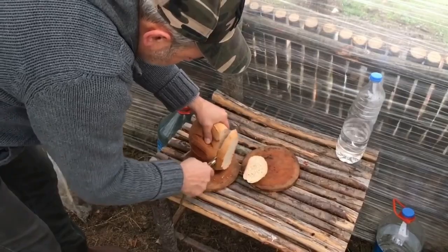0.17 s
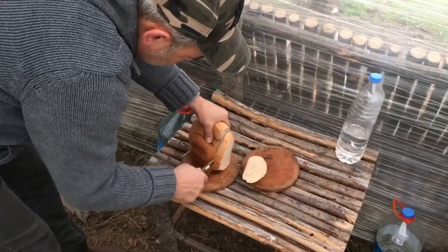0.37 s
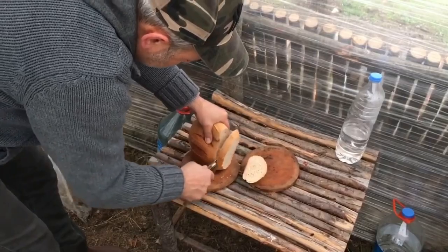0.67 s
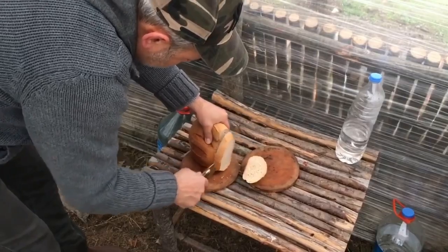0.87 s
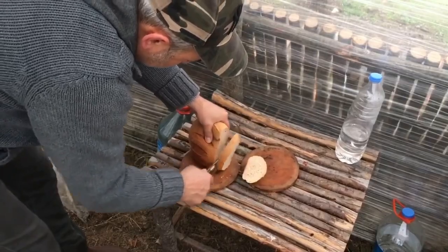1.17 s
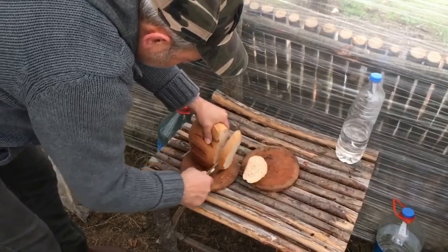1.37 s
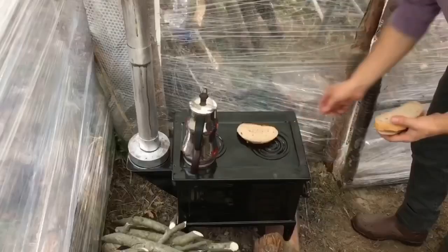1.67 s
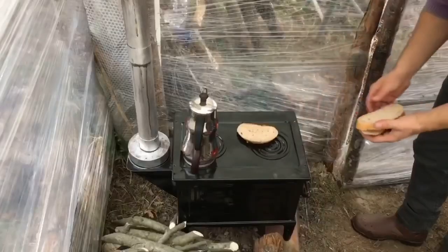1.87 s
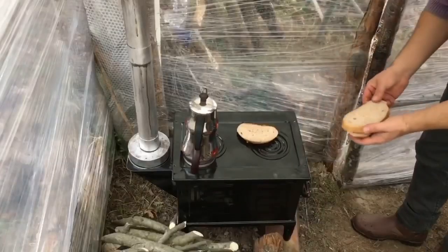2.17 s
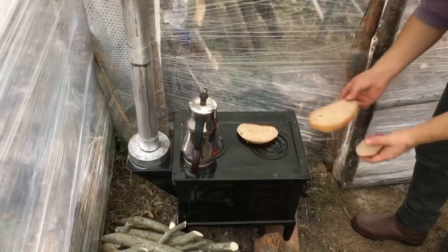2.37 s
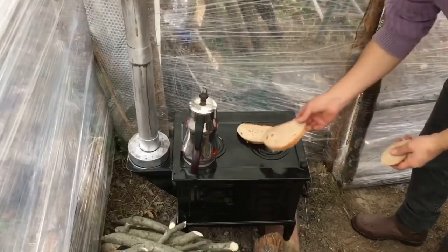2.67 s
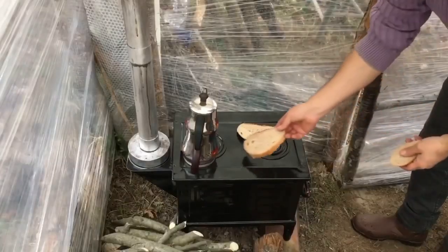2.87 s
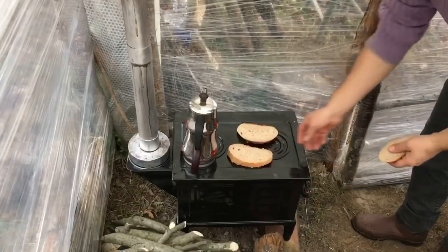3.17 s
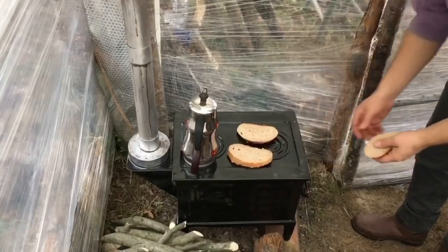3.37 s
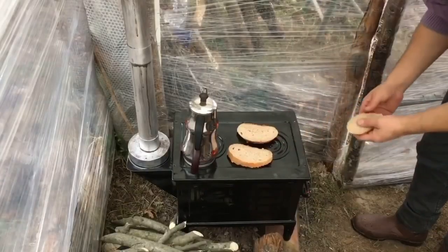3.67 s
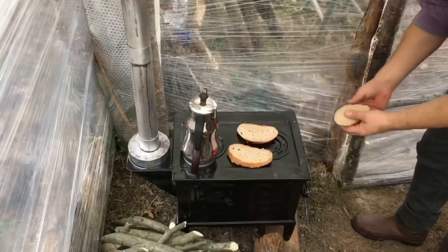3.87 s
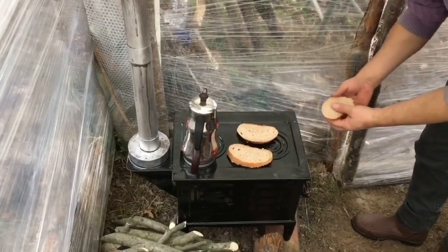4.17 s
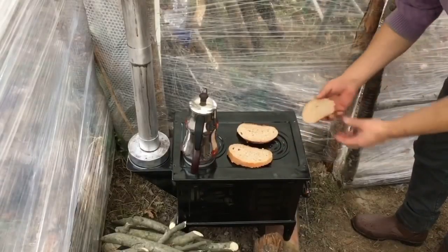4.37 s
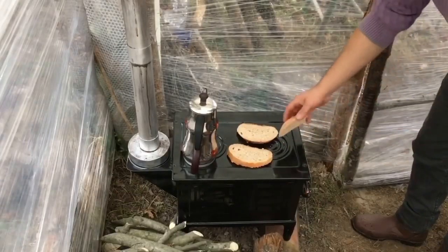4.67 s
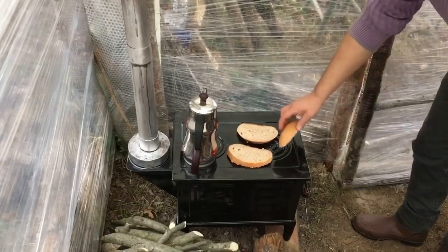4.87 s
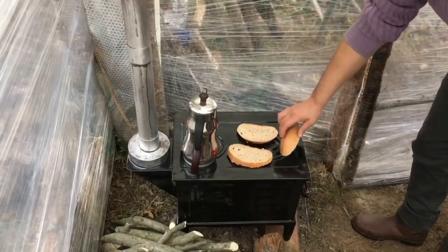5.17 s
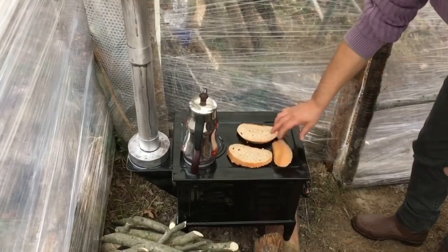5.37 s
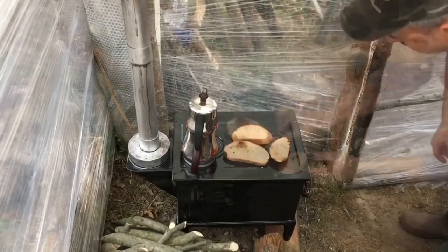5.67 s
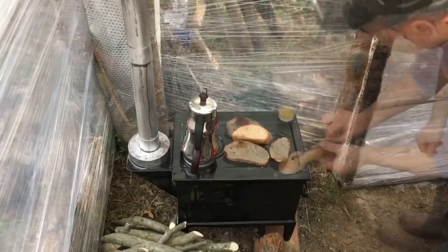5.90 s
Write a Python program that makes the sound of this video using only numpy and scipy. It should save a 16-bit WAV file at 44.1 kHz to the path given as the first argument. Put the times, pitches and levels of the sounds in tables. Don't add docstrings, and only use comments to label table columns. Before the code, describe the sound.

A knife crackles through a crusty loaf on a knocking board, then a kettle hisses on a stove as bread slices thump onto hollow metal.

```python
import sys
import numpy as np
from scipy import signal
from scipy.fft import rfft, irfft
from scipy.io import wavfile
from scipy.ndimage import uniform_filter1d

SR = 44100
rng = np.random.default_rng(int(sys.argv[2]) if len(sys.argv) > 2 else 0)


def elevation(decibels):
    levels = np.asarray(decibels, float)
    return 10 ** (levels / 20)


def master_out(mix):
    frames = np.transpose(np.atleast_2d(mix))
    ceiling = np.clip(frames, -1, 1)
    pcm = np.round(ceiling * 32767).astype(np.int16)
    wavfile.write(sys.argv[1], SR, pcm)


N = 266143


def evened(x):
    return x / np.sqrt(np.mean(x ** 2) + 1e-20)


def read(points, hz):
    f, value = np.transpose(points)
    return np.interp(np.log(hz + 1), np.log(f + 1), value)


def column(rows, t, order):
    table = np.array(rows)
    return np.interp(t, table[:, 0], table[:, order])


def add(mix, s, sound):
    part = mix[round(s * SR):][:len(sound)]
    part += sound[:len(part)]


def ring(x, hz, t60):
    r, w = 10 ** (-3 / (t60 * SR)), 2 * np.pi * hz / SR
    return signal.lfilter([0, np.sin(w)], [1, -2 * r * np.cos(w), r * r], x)


def shaped(x, gain_db):
    hz = np.fft.rfftfreq(len(x), 1 / SR) + 1
    return evened(irfft(rfft(x) * elevation(gain_db(hz)), len(x)))


def tilted(x, db_per_octave):
    return shaped(x, lambda hz: db_per_octave * np.log2(hz / 2000))


def humped(x, centre_hz, fall_db):
    return shaped(x, lambda hz: -fall_db * np.log2(hz / centre_hz) ** 2)


def patchy(x, field, patchy_db, flicker_db, size):
    hop = dict(nperseg=size, noverlap=size * 3 // 4)
    hz, t, z = signal.stft(x, SR, **hop)
    chance = rng.standard_normal(z.shape)
    patches = evened(uniform_filter1d(uniform_filter1d(chance, size=8, axis=0), size=10, axis=1))
    flicker = evened(uniform_filter1d(chance.mean(0), size=5))
    gain = elevation(field(hz[:, None], t) + patchy_db * patches + flicker_db * flicker)
    return evened(signal.istft(z * gain, SR, **hop)[1][:N])


# t/s, fire level/dB
DRAUGHT = [(0.0, -63), (0.35, -63.5), (0.65, -66.5), (1.44, -64.5), (1.54, -57.5), (2.05, -54.5),
           (2.45, -57.5), (2.9, -50), (3.21, -56.5), (3.37, -54), (3.7, -59), (4.05, -54.5), (4.99, -55),
           (5.29, -52), (5.59, -57), (5.73, -59)]
# f/Hz, density/dB per Hz
RUMBLE = [(12, -40), (20, -28.5), (55, -1), (123, -1.5), (173, -6), (208, -1.5), (269, -23), (334, -14),
          (461, -37), (500, -38), (650, -38), (1100, -120)]


def fire():
    rumble = patchy(rng.standard_normal(N), lambda hz, s: read(RUMBLE, hz),
                    patchy_db=1.5, flicker_db=2.73, size=2048)
    lumps = evened(uniform_filter1d(uniform_filter1d(rng.standard_normal(N), size=900), size=900))
    draught_db = column(DRAUGHT, np.arange(N) / SR, order=1)
    return elevation(draught_db + 0.73 * lumps + 1.0) * rumble


# f/Hz, density/dB per Hz
AIR = [(150, -10.5), (250, -1.5), (957, -7), (1950, -8), (2860, -11.5), (3560, -9), (4840, -14),
       (5740, -10), (9120, -13), (10000, -24), (13000, -46), (22000, -120)]
# start t/s, level/dB, drift/dB per s
SHOTS = [
    (0.0, -73, 0.1),
    (1.4655, -70.2, 1.25),
    (5.6, -69.8, -5.0),
]


def air():
    t = np.arange(N) / SR
    rustle = patchy(rng.standard_normal(N), lambda hz, s: read(AIR, hz),
                    patchy_db=.9, flicker_db=.4, size=512)
    level_db = np.zeros(N)
    for s, db, drift in SHOTS:
        level_db = np.where(t >= s, db + drift * (t - s), level_db)
    draught_db = column(DRAUGHT, t, order=1)
    level_db += 0.14 * (draught_db - uniform_filter1d(draught_db, size=SR))
    return elevation(level_db + 6.0) * rustle


def crack(db, hz, length_s, broad):
    clicks = rng.standard_normal(4000) * (0.2 + (rng.random(4000) < .06))
    t = np.arange(len(clicks)) / SR
    shower = clicks * (np.exp(-t / (.55 * length_s)) + 1.8 * np.exp(-t / .0015))
    octaves = 0.57 + 0.72 * broad
    edges_hz = np.clip(hz * 2. ** (np.array([-1, 1]) * octaves), 200, .45 * SR)
    tone = ring(shower, hz, 35 / hz)
    snap = signal.lfilter(*signal.butter(2, edges_hz, "bandpass", fs=SR), shower)
    broad = np.clip(broad, 0, 1)
    return elevation(db) * ((1 - broad) * tone / abs(tone).max() + broad * snap / abs(snap).max())


# t/s, peak level/dB, ring f/Hz, length/s, broad share/0-1
SPLITS = [(0.0278, -54, 5920, 0.022, 0.55), (0.281, -45.5, 6800, 0.02, 0.6), (0.345, -48, 5810, 0.024, 0.6),
          (0.4595, -44.5, 5690, 0.038, 0.5), (0.4864, -43, 7160, 0.014, 0.86),
          (0.551, -39.5, 5900, 0.023, 0.8), (0.562, -40.5, 8900, 0.013, 0.63),
          (0.682, -42.5, 6100, 0.07, 0.3), (0.756, -53, 8650, 0.024, 0.45), (0.797, -47, 5970, 0.033, 0.96),
          (0.8378, -43, 7000, 0.016, 0.54), (0.996, -46.5, 5820, 0.02, 0.45),
          (1.049, -48, 6150, 0.016, 0.55), (1.343, -45.5, 7990, 0.02, 0.64), (1.437, -34, 5930, 0.014, 0.7)]
# t/s, peak level/dB, ring f/Hz, length/s, broad share/0-1
CRACKS = [(0.12, -43.5, 3500, 0.022, 0.57), (0.126, -49, 2600, 0.02, 0.27),
          (0.228, -51.5, 3230, 0.025, 0.7), (0.512, -42, 2900, 0.021, 0.75),
          (0.525, -46, 2110, 0.044, 0.65), (0.613, -54, 2340, 0.03, 0.8), (0.649, -48.5, 2130, 0.048, 0.8),
          (0.7447, -47.5, 3930, 0.054, 1), (0.812, -42.5, 3640, 0.055, 0.45),
          (1.067, -42.5, 3400, 0.015, 0.8), (1.097, -65, 2140, 0.03, 0.7)]


def crust():
    out = np.zeros(N)
    for s, db, hz, length_s, broad in SPLITS + CRACKS:
        add(out, s, crack(db, hz, length_s, broad))
    return out


# peak t/s, level/dB, build-up/s
STROKES = [(0.122, -55.5, 0.042), (0.232, -64, 0.01), (0.555, -58, 0.11), (0.678, -65, 0.073),
           (0.82, -58, 0.013), (0.992, -62.5, 0.13), (1.342, -68, 0.018), (1.438, -54, 0.035),
           (5.218, -65, 0.03), (5.508, -52, 0.034), (5.554, -54, 0.02), (5.8, -65, 0.01)]
# start t/s, end t/s, level/dB
RESTING = [
    (0.23, 0.493, -69.5),
    (0.99, 1.44, -68.5),
    (5.226, 5.5, -67.5),
    (5.61, 6.03, -69.5),
]


def sawing():
    t = np.arange(N) / SR
    clumps = elevation(2.5 * evened(uniform_filter1d(rng.standard_normal(N), size=300)))
    splits = (rng.random(N) < 5000 / SR) * rng.standard_normal(N)
    splits = splits + .25 * rng.standard_normal(N)
    grains = signal.lfilter(*signal.butter(2, 1300., "highpass", fs=SR), clumps * splits)
    grains = tilted(grains, -3.0)
    depth_db, release_s = 29.5, 0.054
    pressure = np.zeros(N)
    for s, db, build_s in STROKES:
        pressure += elevation(db - depth_db * np.maximum((s - t) / build_s, (t - s) / release_s))
    resting = sum(elevation(db) * (t > a) * (t < b) for a, b, db in RESTING)
    pressure += uniform_filter1d(resting, size=600)
    return elevation(-2) * pressure * grains


# t/s, peak level/dB, ring f/Hz, t60/s
KNOCKS = [
    (0.315, -57, 264, 0.038),
    (0.497, -54.5, 207, 0.074),
    (0.694, -47.5, 257, 0.049),
    (1.145, -52, 263, 0.13),
    (1.396, -45, 209, 0.035),
    (1.899, -53, 324, 0.033),
    (2.568, -44.5, 300, 0.026),
]


def knocks():
    out = np.zeros(N)
    ratios = (.75, 1, 1.25, 1.5, 1.8, 2.1, 2.5, 2.9, 3.4, 3.9)
    for s, db, hz, t60 in KNOCKS:
        push = rng.standard_normal(6000) * np.exp(-np.arange(6000) / 690.0)
        thud = sum(ring(push, ratio * hz, t60 / ratio) for ratio in ratios)
        add(out, s, elevation(db) * thud / abs(thud).max())
    return out


# t/s, length/s, level/dB, start f/Hz, end f/Hz
SQUEAKS = [
    (.34, .12, -76, 3350, 3200),
    (.86, .1, -75, 2650, 2450),
    (1.285, .08, -72, 2750, 2480),
]


def squeaks():
    out = np.zeros(N)
    for s, length_s, db, start_hz, end_hz in SQUEAKS:
        t = np.arange(0, length_s, 1 / SR)
        turns = np.cumsum(np.linspace(start_hz, end_hz, len(t))) / SR
        fuzz = 1 + .4 * evened(uniform_filter1d(rng.standard_normal(8000), size=200))[:len(t)]
        swell = np.sqrt(np.sin(np.pi * t / length_s))
        add(out, s, elevation(db) * fuzz * np.sin(2 * np.pi * turns) * swell)
    return out


# t/s, level/dB, brightness/dB per octave
SIMMER = [(1.47, -58, -0.5), (1.66, -54.5, 0.5), (2.22, -48.5, 0.0), (2.41, -47.5, 1.5), (2.69, -48.5, 1.5),
          (3.11, -51, 0.0), (3.61, -47.5, -1), (3.87, -49, -2.5), (4.56, -55.5, -2.5), (5.1, -59, -3),
          (5.44, -74, 1), (5.6, -67, -2)]
# f/Hz, density/dB per Hz
SIMMER_BODY = [(410, -43), (700, -30), (1210, -24.5), (1590, -6.5), (3400, -1.5), (4110, -12.5), (5730, -4),
               (7240, -3.5), (8280, -6.5), (10000, -7.5), (13000, -39), (22000, -120)]
# f/Hz, width/Hz, level above body/dB
KETTLE = [(967, 420, 19.5), (2030, 140, 1.5), (2730, 580, 2), (3470, 180, 3), (4370, 1050, 9),
          (5170, 240, 9), (5590, 130, 7), (5850, 130, 10), (6270, 220, 3.5), (6740, 190, 7), (7000, 42, -9),
          (8210, 580, 10), (9100, 440, 6)]


def kettle():
    t = np.arange(N) / SR
    start_s, end_s = CUTS[0][0], CUTS[1][0]
    heights = rng.standard_normal(N) * elevation(1.33 * np.minimum(rng.exponential(1, N), 5))
    pops = (rng.random(N) < 6000 / SR) * heights
    water = np.exp(-np.arange(900) / 480.0) * rng.standard_normal(900)
    smeared = evened(signal.oaconvolve(pops, water)[:N])
    drive = evened(pops) + 1.1 * rng.standard_normal(N) + 0.29 * smeared

    def colour(hz, s):
        wall = sum(db / (1 + (2 * (hz - f) / width) ** 2) for f, width, db in KETTLE)
        ringing = read(SIMMER_BODY, hz) + wall
        plain = uniform_filter1d(ringing, size=28, axis=0)
        awake = np.clip(0.3 + 0.7 * ((s - start_s) / 0.55) ** 2, 0, 1)
        tilt = column(SIMMER, s, order=2) * np.log2((hz + 1) / 4000)
        return plain + awake * (ringing - plain) + tilt

    hiss = patchy(drive, colour, patchy_db=1.45, flicker_db=0.93, size=1024)
    return elevation(column(SIMMER, t, order=1) - 1.02) * hiss * (t > start_s) * (t < end_s)


# t/s, peak level/dB, ring f/Hz, broad share/0-1
TICKS = [(2.419, -50, 3200, 0.75), (3.787, -34, 2750, 0.7), (3.884, -35, 3470, 0.9),
         (4.05, -33, 2730, 0.66), (4.109, -32.5, 3640, 1.0), (4.349, -44.5, 1750, 1.0),
         (4.438, -36.5, 2930, 0.93), (4.506, -36.5, 2300, 0.88), (4.583, -37.5, 3330, 0.65),
         (4.69, -43, 1550, 0.7), (4.916, -37.5, 2960, 0.65), (5.063, -39, 2720, 0.55),
         (5.401, -42.5, 2930, 0.8), (5.508, -36, 2860, 0.7), (5.551, -35.5, 4280, 0.5),
         (5.793, -43.5, 2790, 0.54), (5.808, -46, 2030, 0.7), (3.492, -27, 5790, 0.9),
         (5.3527, -44, 5760, 0.55), (5.5694, -54, 5550, 0.4), (5.619, -50, 5250, 0.5),
         (5.6626, -37.5, 9250, 0.9)]


def crumbs():
    out = np.zeros(N)
    for s, db, hz, broad in TICKS:
        add(out, s, crack(db, hz, 0.011, broad))
    return out


# t/s, thump level/dB, contact/s, crust rattle level/dB, rattle f/Hz
LANDINGS = [(2.8084, -37, 0.0011, -39, 1270), (2.823, -54, 0.0035, -40, 1500),
            (2.8383, -28, 0.0017, -34.5, 2300), (2.857, -46, 0.00092, -45.5, 1150),
            (2.886, -60, 0.0051, -56, 890), (5.1335, -33, 0.0033, -54.5, 1500),
            (5.1534, -41, 0.0024, -41.5, 4200), (5.157, -20.5, 0.0035, -40, 1700),
            (5.186, -46, 0.001, -48, 1200), (5.228, -63, 0.0063, -55, 2400),
            (5.262, -60, 0.0049, -59.5, 1250)]
# f/Hz, level/dB, t60/s
BOX = [(156, -12, 0.16), (209, 2.5, 0.12), (244, 1.5, 0.069), (282, -5, 0.055), (316, -3.5, 0.16),
       (341, -4.5, 0.077), (430, -9, .06), (540, -5.5, 0.14)]
# f/Hz, level/dB, t60/s
PLATE = [(785, -8, .06), (950, -5, .07), (1034, -1, .06), (1145, -4, .08), (1300, -5, .05), (1570, -5, .07),
         (1995, -5, .08), (2350, -4, .05), (2692, -6, .08), (3203, -3, .07), (3520, -5, .05),
         (4195, -4, .08), (5750, -5, .07), (6573, -8, .05)]


def stove():
    blows, rattle, t = np.zeros(N), np.zeros(N), np.arange(12000) / SR
    rise = np.minimum(t / .004, 1)
    for s, db, contact_s, rattle_db, centre_hz in LANDINGS:
        push = np.sin(np.pi * np.clip(t[:900] / contact_s, 0, 1)) ** 2
        add(blows, s, elevation(db) * push / push.sum())
        lumps = np.repeat(rng.standard_normal(len(t) // 100), 100)
        grit = rng.standard_normal(len(t)) * elevation(2.1 * lumps)
        t60 = 0.15 * (centre_hz / 1500) ** -0.23
        add(rattle, s, elevation(rattle_db - 60 * t / t60) * rise * humped(grit, centre_hz, fall_db=2.5))
    box = sum(elevation(db) * ring(blows, hz, t60) for hz, db, t60 in BOX)
    box = signal.sosfilt(signal.butter(4, 135., "highpass", fs=SR, output="sos"), box)
    plate = sum(elevation(db) * ring(rattle, hz, t60) for hz, db, t60 in PLATE)
    return box + 1.59 * rattle + elevation(-31.5) * plate


def shelter(x):
    at = np.arange(200, 8000, 20) + rng.integers(0, 20, 390)
    taps = np.zeros(8100)
    taps[at] = rng.choice([-1., 1.], len(at)) * elevation(-60 * at / SR / 0.23)
    return signal.oaconvolve(x, taps / np.linalg.norm(taps))[:N]


def scene():
    small = crust() + sawing() + knocks() + squeaks() + crumbs()
    big, simmer = stove(), kettle()
    echoes = shelter(elevation(-9.0) * small + elevation(-17) * big + elevation(-9) * simmer)
    return (small + big + elevation(-0.24) * simmer + echoes + air() + fire())[None]


# t/s, fade-out/s, fade-in/s
CUTS = [
    (1.4655, 0.044, 0.029),
    (5.6, 0.03, 0.024),
]


def scene_changes(x):
    t = np.arange(N) / SR
    for s, out_s, in_s in CUTS:
        x = x * np.clip(np.maximum((s - t) / out_s, (t - s) / in_s), .02, 1)
    return x


def low_pass(x):
    return signal.sosfilt(signal.butter(12, 10290, fs=SR, output="sos"), x)


def record(dry):
    lowpass = signal.firwin(255, 9888, window=("kaiser", 9), fs=SR)
    band = signal.oaconvolve(scene_changes(dry), lowpass[None], "same")
    return low_pass(band)


dry = scene()
out = record(dry)
master_out(out)
```